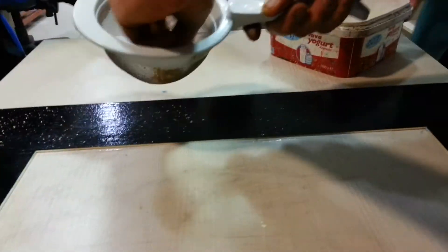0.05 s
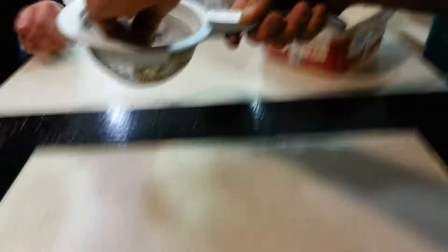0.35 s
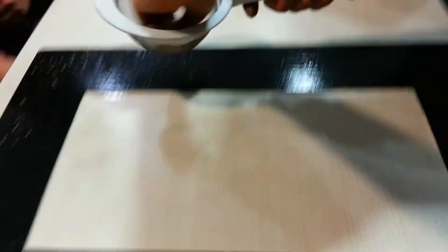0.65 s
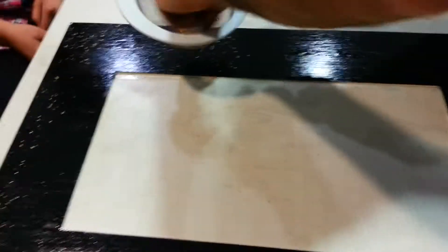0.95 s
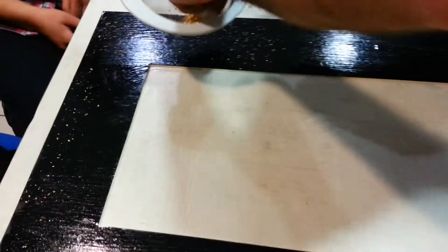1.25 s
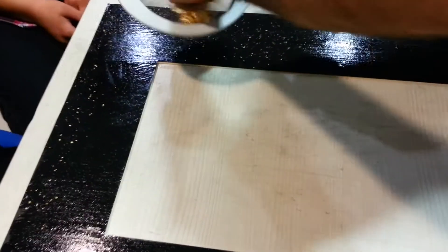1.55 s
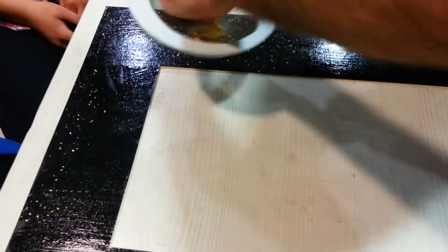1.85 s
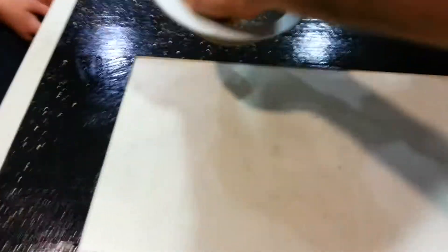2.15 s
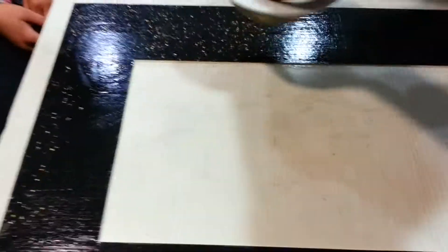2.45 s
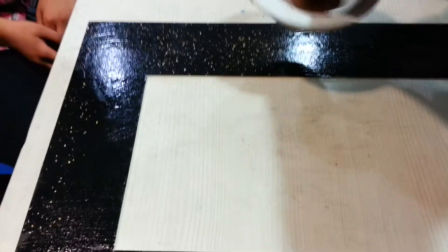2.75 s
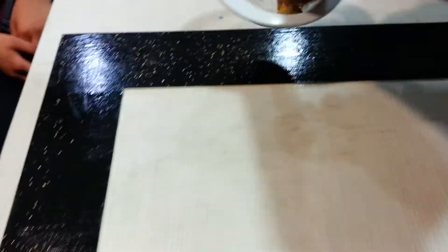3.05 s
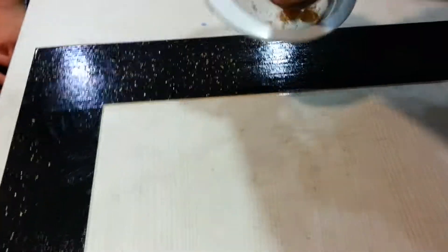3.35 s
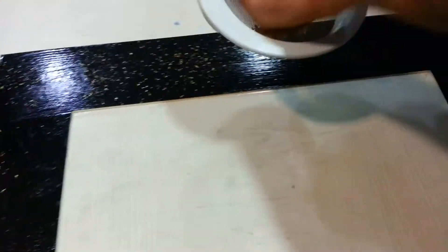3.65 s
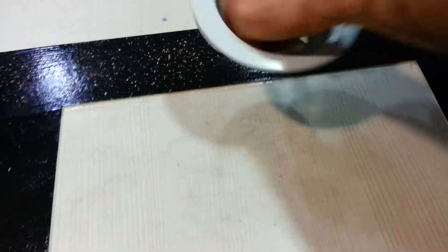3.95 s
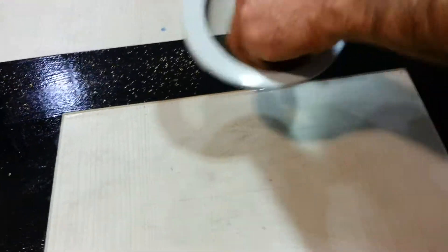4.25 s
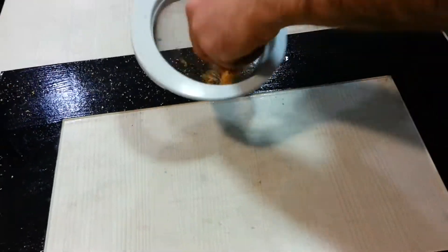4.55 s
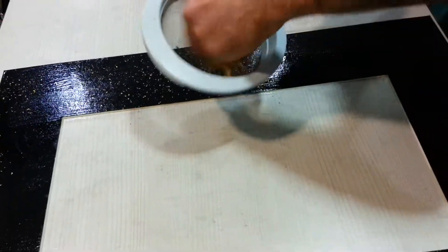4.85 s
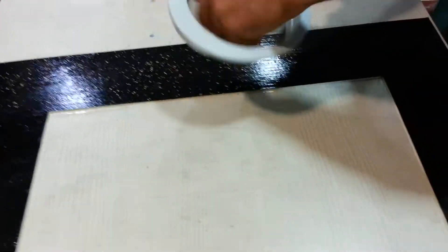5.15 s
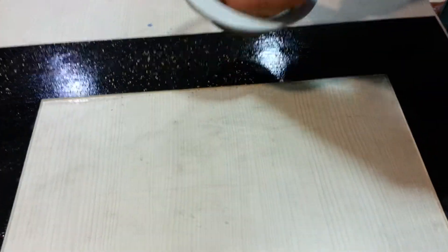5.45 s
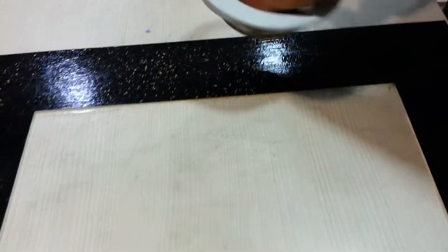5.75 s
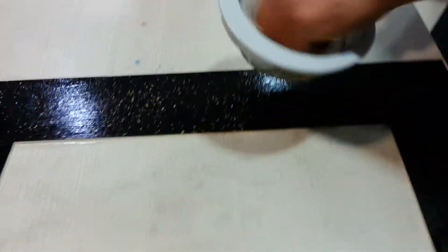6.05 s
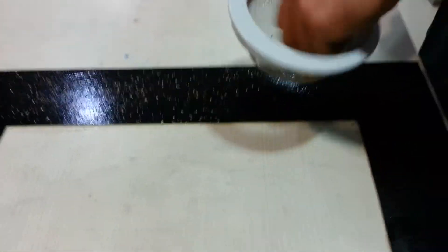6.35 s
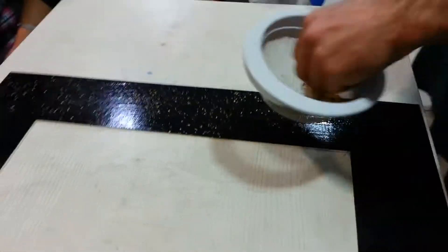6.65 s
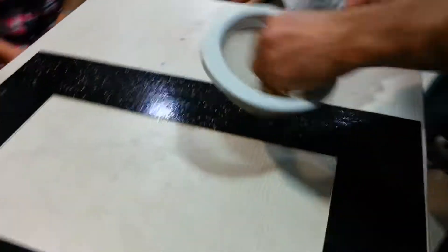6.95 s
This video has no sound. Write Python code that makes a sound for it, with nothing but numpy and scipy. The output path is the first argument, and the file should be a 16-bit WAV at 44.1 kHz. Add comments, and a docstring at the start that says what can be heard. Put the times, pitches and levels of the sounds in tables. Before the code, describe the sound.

Thin metal leaf is rubbed through a small sieve in quick, scratchy crackling strokes, with light ticks and soft handling bumps.

```python
"""A hand rubs metal leaf through a small mesh sieve over a table, close to a camera in a room.
From the start each stroke is a fine crackle of tearing flakes, over low room noise. A finger scrapes
the mesh now and then, and the held camera is bumped softly. From about 2 s, wires snap free and tick.
At 4.6 and 5.3 s two dull knocks on wood ring through the room. Skin then squeaks on a wire, a stiff
flake crinkles, and the last strokes fade among more soft bumps and a brief rustle."""
import sys
import numpy as np
from scipy import signal
from scipy.fft import rfft, irfft, next_fast_len
from scipy.io import wavfile

SR = 44100
rng = np.random.default_rng(int(sys.argv[2]) if len(sys.argv) > 2 else 0)


def to_wav(sig):
    """Store sig (one row per channel, or 1-D mono) as 16-bit WAV at the path in sys.argv[1].

    Samples outside -1..1 are clipped; the rate is SR.
    """
    pcm = np.clip(np.atleast_2d(sig), -1, 1) * 32767
    pcm = np.round(pcm).astype(np.int16)
    wavfile.write(sys.argv[1], SR, pcm.T)  # frames by channels


N = 309141
TIME = np.arange(N) / SR

# The fingers rub to and fro, about four strokes a second.
# Each row: start in seconds, length in seconds, level in dB, share of the length at peak speed.
FINGER_STROKES = [(-.06, 0.16, -48, 0.42), (0.541, 0.25, -42, 0.46), (0.816, 0.26, -45, 0.57),
                  (1.068, 0.31, -44, 0.43), (1.353, 0.33, -45, 0.23), (1.64, 0.24, -43.5, 0.15),
                  (1.862, .15, -43.5, 0.62), (2.005, .13, -43.5, 0.34), (2.178, 0.34, -47.5, 0.14),
                  (2.415, 0.22, -44.5, 0.27), (2.702, 0.17, -45, 0.058), (2.86, 0.35, -46, 0.41),
                  (3.198, 0.36, -43.5, 0.13), (3.41, 0.32, -45.5, 0.33), (3.674, 0.32, -44.5, 0.11),
                  (3.941, 0.097, -46.5, 0.52), (4.036, .15, -39.5, 0.28), (4.16, 0.36, -47.5, 0.58),
                  (4.483, 0.18, -51.5, 0.17), (4.621, 0.24, -49.5, 0.068), (4.795, 0.24, -50.5, 0.23),
                  (4.91, 0.32, -48, 0.57), (5.22, 0.28, -45, 0.27), (5.412, .25, -45.5, 0.62),
                  (5.681, 0.14, -44.5, 0.69), (5.94, 0.3, -47.5, 0.81), (6.185, 0.58, -48.5, 0.21),
                  (6.629, 0.13, -51.5, .22), (6.786, 0.11, -53.5, 0.19), (6.892, .14, -50, 0.37)]
# The hand at the sieve. Each row: time in seconds, left minus right in dB, boost of the rasp in dB.
HAND_PATH = [(0, -8, 4.5), (.35, 4, 13), (.6, -6.5, 1), (1.5, -9, -3.5), (2.5, -8, 1.5), (3.5, -8.5, -1),
             (4.5, -8.5, 5.5), (6, -7, 3.5), (7, -4.5, 9)]
# Spectra of tearing leaf and of the mesh. Each row: frequency in Hz, left and right levels in dB.
LEAF_SPECTRUM = [(60, -48, -64), (397, -16, -12), (776, -31, -19), (1410, -23, -17.5), (2220, -18.5, -22),
                 (2900, -22, -18.5), (4080, -23, -14), (5000, -15, -11.5), (6220, -12.5, -7),
                 (7340, -18.5, 2.5), (8520, -20.5, -4), (9900, -22, -9), (13200, -24, -13.5),
                 (14200, -22.5, -18)]
MESH_SPECTRUM = [(30, -33, -51), (79, -34, -42), (199, -12.5, -10.5), (563, -24, -23), (694, -18.5, -16.5),
                 (1250, -20.5, -26), (1790, -18, -23.5), (2160, -11, -16.5), (3360, -17.5, -14.5),
                 (4940, -12.5, -11), (6100, -8, -6), (7190, -14, 3.5), (8250, -16, -3.5),
                 (10540, -23, -13.5), (13100, -23, -18), (14300, -25.5, -26)]
# Low noise of the room air and the grip. Each row: time in seconds, level in dB.
RUMBLE_LEVEL = [(0, -60.5), (.37, -58), (1.09, -62.5), (2.9, -61.5), (3.4, -59), (4.25, -58), (4.55, -61.5),
                (6.8, -60.5), (7, -54.5)]
# Swells of a faint rustle. Each row: peak time in seconds, level in dB, rise and fall in seconds.
RUSTLE_SWELLS = [(.45, -58.5, .2, 0.097), (.65, -58.5, 0.17, 0.47), (6.55, -59, .1, 0.14),
                 (6.99, -44, 0.04, 0.033)]
# A finger drags over the wires. Each row: time of full force in seconds, rise and hold in seconds,
# relative level in dB, boost of the rasp in dB.
FINGER_SCRAPES = [(0.152, 0.0067, 0.013, -49, 35), (0.638, 0.0036, .004, -42.5, 10),
                  (1.522, 0.017, 0.011, -34, 0.5), (2.032, 0.0045, 0.02, -30.5, 2),
                  (2.278, 0.0022, 0.028, -29.5, 1), (2.569, 0.019, 0.0017, -43.5, 4),
                  (3.074, 0.0076, 0.011, -36, 0.5), (3.334, 0.015, 0.023, -30, -3),
                  (3.58, 0.034, 0.013, -33.5, 2), (3.732, 0.014, 0.0061, -37.5, 1),
                  (3.817, 0.0031, 0.01, -30.5, 0), (4.061, .003, 0.023, -28.5, 1),
                  (4.324, 0.0065, 0.0022, -44.5, 24), (4.832, 0.024, .002, -44, -4),
                  (5.067, 0.0099, 0.016, -35, 3), (5.769, 0.039, 0.0033, -38, 9.5),
                  (6.133, 0.023, 0.013, -40, 8), (6.526, 0.025, 0.021, -48, 25)]
# Handling of the camera. Each row: peak time in seconds, relative level in dB, rise and fall in
# seconds, low-pass cutoff in Hz.
CAMERA_BUMPS = [(0.168, -36.5, 0.032, 0.022, 1800), (.187, -36, .008, .03, 900),
                (.302, -38, 0.038, 0.017, 900), (.325, -47, 0.0092, 0.054, 350),
                (3.463, -50, 0.04, 0.034, 250), (4.128, -48, 0.098, 0.067, 180),
                (4.374, -52.5, 0.052, 0.043, 700), (4.445, -51, 0.026, 0.04, 500),
                (6.082, -55, 0.0038, .083, 500), (6.341, -50.5, 0.047, 0.045, 397),
                (6.404, -46, 0.042, .02, 350), (6.873, -51.5, 0.005, .026, 600)]
# A wire snaps free. Each row: start in seconds, level in dB, left minus right in dB.
WIRE_TICKS = [(1.901, -46.5, -9.5), (2.157, -47.5, -5.5), (2.431, -46.5, -10), (2.675, -45, -8),
              (2.917, -48.5, -3), (3.223, -51, 4), (3.346, -36.5, -15), (3.45, -43, -8.5), (3.58, -39, -17),
              (3.698, -40.5, -9), (3.823, -36, -27), (3.934, -40.5, -9.5), (4.208, -41.5, -12.5),
              (4.327, -42.5, -9), (4.441, -40, -9.5), (4.938, -48, -8), (5.466, -49, -12), (5.7, -46, -7),
              (5.889, -48, -1.5)]
# Knocks across the room. Each row: start in seconds, level in dB, high-pass and low-pass cutoffs in Hz,
# delay of the second contact in seconds, its strength relative to the first, ring level in dB,
# hollow tone in Hz, its level in dB. Ring and tone levels are relative to the thud.
WOOD_KNOCKS = [(4.637, -41, 490, 1690, 0.0047, 0.54, -0.5, 661, -4.5),
               (5.321, -44, 150, 1580, 0.011, 0.69, -4, 474, -10.5)]
# Skin sticks on a wire. Each row: start in seconds, pitch in Hz, level in dB, fall in seconds.
SKIN_SQUEAKS = [(5.59, 4100, -43, .004), (5.7, 5350, -46, .03), (5.699, 7500, -40, .03),
                (5.765, 5280, -36, .014), (5.767, 5900, -39, .012)]
# A stiff flake crinkles. Each row: start in seconds, level in dB, left minus right in dB.
FLAKE_CRINKLES = [(6.3164, -52, -5), (6.352, -36.5, 12), (6.381, -42.5, -18), (6.4066, -42, -18),
                  (6.445, -49, 3), (6.454, -56, -8), (6.4723, -51, -2)]
# Modes of the camera case and of the wood.
# Each row: frequency in Hz, relative level in dB, time to decay by 60 dB in seconds.
CASE_MODES = [(315.3, -13.5, 0.093), (359.6, -14, 0.17), (400, -7, 0.22), (784, -5, 0.061), (815, 0, 0.047)]
WOOD_MODES = [(135.2, -8.5, 0.35), (270, -8.5, 0.75), (408.5, -8.5, 0.59), (493, -22, 0.18), (626, 0, 0.35),
              (674, -19, .12), (790, -3, 0.38), (854, -6.5, 0.38), (954, -5.5, 0.19), (1215, -15, 0.42),
              (1302, -14, 0.27), (1447, -7, .36), (1865, -17, 0.39), (2385, -25, .42)]
# Spectra of room air, a bump, a thud and a crinkle. Each row: frequency in Hz, relative level in dB.
AIR_SPECTRUM = [(20, -7), (50, -12), (72, -8), (95, 2.5), (160, 4.5), (240, 6), (340, -2.5), (430, 0),
                (600, -5), (1000, -6.5), (1500, -12), (2200, -9), (3200, -29), (5500, -46)]
BUMP_SPECTRUM = [(50, -18), (120, 4.5), (220, 7.5), (350, 8.5), (440, 3.5), (580, 3), (800, 6),
                 (1100, -6.5), (1600, -3.5), (2300, -3), (3200, -12.5), (8000, -29)]
THUD_SPECTRUM = [(50, -30), (90, -10.5), (135, 3.5), (400, -5), (540, -5.5), (680, 2.5), (860, -5.5),
                 (1050, -10.5), (1450, -9), (1700, -12), (2500, -12), (3100, -21), (8000, -25.5)]
CRINKLE_SPECTRUM = [(1000, -16), (4200, -20), (5600, 9.5), (7000, 7), (8700, -11), (10500, 4), (12500, -2),
                    (14500, -11)]
# Likeness of the two microphones. Each row: frequency in Hz, correlation.
MIC_CORRELATION = [(30, 0.37), (70, 0.7), (150, 1), (300, 0.83), (600, 0.57), (1200, 0.091), (3000, 0.062),
                   (7000, 0.02)]
# Reverberation of the room. Each row: frequency in Hz, time to decay by 60 dB in seconds.
ROOM_T60 = [(120, 0.38), (320, 0.59), (840, 0.18), (2200, 0.33), (7000, 0.27), (14000, 0.13)]


def amp(db):
    """Amplitude grows tenfold with every 20 dB."""
    return 10 ** (np.asarray(db) / 20)


def unit(x):
    """Normalisation to an rms of 1."""
    return x / np.sqrt(np.mean(x ** 2) + 1e-20)


def at_hz(table, hz, column=1):
    """Interpolation of one column along a logarithmic frequency axis."""
    columns = np.transpose(table)
    return np.interp(np.log(hz + 1), np.log(columns[0] + 1), columns[column])


def curve(table, column=1):
    """Linear interpolation of one column over time."""
    columns = np.transpose(table)
    return np.interp(TIME, columns[0], columns[column])


def add(mix, start, sound):
    """Superposition: a stereo sound joins the mix at a start time in seconds."""
    part = mix[:, max(round(start * SR), 0):][:, :sound.shape[1]]
    part += sound[:, :part.shape[1]]


def band(x, hz, kind, order=2):
    """Butterworth filtering, maximally flat in the passband."""
    sections = signal.butter(order, np.clip(hz, 10, SR / 2 - 1), kind, fs=SR, output="sos")
    return signal.sosfilt(sections, x)


def colour(x, table, size=4096):
    """Minimum-phase filtering at unit energy; two level columns give each side its own spectrum."""
    hz = np.fft.rfftfreq(size, 1 / SR)
    cepstrum = irfft(np.log(amp([at_hz(table, hz), at_hz(table, hz, column=-1)])))
    # folding the cepstrum makes the filter causal
    cepstrum[:, 1:size // 2] *= 2
    cepstrum[:, size // 2 + 1:] = 0
    taps = unit(irfft(np.exp(rfft(cepstrum)))) / np.sqrt(size)
    return signal.oaconvolve(x, taps, axes=1)[:, :x.shape[1]]


def noise(count):
    """Partial coherence: white noise at two microphones, most alike in the bass."""
    size = next_fast_len(count, True)
    left, independent = rfft(rng.standard_normal((2, size)))
    correlation = np.clip(at_hz(MIC_CORRELATION, np.linspace(0, SR / 2, len(left))), -1, 1)
    right = correlation * left + np.sqrt(1 - correlation ** 2) * independent
    return irfft([left, right], size)[:, :count]


def place(x, pan_db):
    """A level difference between the sides gives direction; the overall rms is 1."""
    sides = amp(np.array([pan_db, -pan_db]).reshape(2, -1) / 2)
    return np.array([unit(x[0]), unit(x[1])]) * sides / np.sqrt(np.mean(sides ** 2, 0))


def grains(per_s, spread_db, life_s):
    """Shot noise: tiny bursts arrive at random, and the energy of each decays exponentially."""
    arrivals = rng.random(N) < per_s / SR
    sizes = amp(spread_db * np.minimum(rng.exponential(1, N), 4.5))
    energy = signal.lfilter([1], [1, -np.exp(-1 / (life_s * SR))], arrivals * sizes ** 2)
    return unit(noise(N) * np.sqrt(energy))


def envelope(t, rise, hold, fall):
    """Exponential growth to 1 at t = 0, a hold, then decay; rise and fall are seconds per 20 dB."""
    return 10 ** (np.minimum(t, 0) / max(rise, 1e-4) - np.maximum(t - hold, 0) / max(fall, 1e-4))


def rasp(x, db):
    """A broad resonance: the lower voice of the wires is raised or cut by db."""
    return x + band(x, [300, 4600], "bandpass", order=1) * (amp(db) - 1)


def rubbing(speed_exponent=1.19, trickle_db=-8.5, trickle_s=0.08, uneven_db=1.22, uneven_s=0.022):
    """Rubbing amplitude follows a power law of finger speed; loose flakes trickle on after a stroke."""
    power = np.zeros(N)
    for start, length, db, fastest in FINGER_STROKES:
        during = (TIME > start) & (TIME < start + length)
        progress = (TIME[during] - start) / length
        travel = np.interp(progress, [0, np.clip(fastest, .05, .95), 1], [0, .5, 1])
        speed = np.sin(np.pi * travel)
        power[during] += (amp(db) * speed ** speed_exponent) ** 2
    decay = np.exp(-1 / (trickle_s * SR))
    trickle = amp(trickle_db) ** 2 * signal.lfilter([1 - decay], [1, -decay], power)
    uneven = unit(band(rng.standard_normal(N), 1 / uneven_s, "lowpass"))
    return np.sqrt(power + trickle) * amp(uneven_db * uneven)


def leaf_crackle(effort):
    """Fracture: flakes tear on the mesh in thousands of tiny bursts, over the rasp of the wires."""
    tears = colour(grains(per_s=7000, spread_db=.8, life_s=.0004), LEAF_SPECTRUM)
    crackle = rasp(tears, curve(HAND_PATH, column=2))
    return place(crackle, curve(HAND_PATH)) * effort


def room(x, first_echo_s=0.0023, size=256):
    """Reverberation: a diffuse tail in which each band decays at its own rate."""
    hz, t, spectra = signal.stft(noise(SR), SR, nperseg=size)
    decay = amp(-60 * t / at_hz(ROOM_T60, hz)[:, None])
    _, tail = signal.istft(spectra * decay, SR, nperseg=size)
    tail *= np.clip(TIME[:tail.shape[1]] / first_echo_s - 1, 0, 1)
    return signal.fftconvolve(x, tail / np.linalg.norm(tail[0]), axes=1)[:, :N]


def background(effort, shudder_db=-20.5):
    """Room rumble and the sieve's shudder add in power, beside a thin hiss and a narrow-band rustle."""
    low_level = np.hypot(amp(curve(RUMBLE_LEVEL)), amp(shudder_db) * effort)
    rumble = colour(noise(N), AIR_SPECTRUM) * low_level
    hiss = colour(noise(N), MESH_SPECTRUM) * amp(-66)
    swells = sum(amp(db) * envelope(TIME - peak, rise, 0, fall) for peak, db, rise, fall in RUSTLE_SWELLS)
    rustle = unit(band(noise(N), [1950, 2550], "bandpass")) * swells
    return rumble + hiss + rustle


def finger_scrapes(lead_s=.06, reflection_s=0.001345):
    """A finger slips from wire to wire; interference with the table's reflection hollows the sound."""
    out, t = np.zeros((2, N)), TIME[:SR // 6]
    slips = colour(grains(per_s=3600, spread_db=.3, life_s=.00025), MESH_SPECTRUM)
    for peak, rise, hold, db, rasp_db in FINGER_SCRAPES:
        force = envelope(t - lead_s, rise, hold, fall=0.018)
        direct = rasp(slips[:, round(peak * SR):][:, :len(t)], rasp_db) * force
        lag = round(SR * reflection_s * (1 + 0.11 * rng.standard_normal()))
        hollow = direct + 0.24 * np.roll(direct, lag, axis=1)
        add(out, peak - lead_s, amp(db + 2.38) * unit(hollow) * np.sqrt(np.mean(force ** 2)))
    return out


def damped_mode(t, hz, db, t60, phase=0):
    """Free vibration: a sinusoid that decays by 60 dB in t60 seconds."""
    return amp(db) * np.exp(-np.log(1000) * t / t60) * np.sin(2 * np.pi * hz * t + phase)


def camera_bumps(lead_s=.06):
    """Structure-borne sound: fingers shift on the camera with dull scuffs, and its case rings briefly."""
    out, t = np.zeros((2, N)), TIME[:SR // 4]
    since_peak = np.maximum(t - lead_s, 0)
    ring = sum(damped_mode(since_peak, *mode) for mode in CASE_MODES)
    ring = band(ring, 184, "highpass")
    for peak, db, rise, fall, dull_hz in CAMERA_BUMPS:
        scuff = unit(colour(noise(len(t)), BUMP_SPECTRUM)) * envelope(t - lead_s, rise, 0.0026, fall)
        add(out, peak - lead_s, amp(db + 2.0) * band(scuff + ring, dull_hz, "lowpass", order=1))
    return out


def wire_ticks(rise_s=0.0011, patter_db=-11):
    """Sudden release: a wire snaps free, followed by a weak patter of near reflections."""
    out, t = np.zeros((2, N)), TIME[:SR // 30]
    attack = 1 - np.exp(-t / rise_s)
    patter = amp(patter_db) * np.exp(-t / 0.017)
    shape = attack * (envelope(t, rise=0, hold=.002, fall=0.0052) + patter)
    for start, db, pan_db in WIRE_TICKS:
        snap = band(colour(noise(len(t)) * shape, MESH_SPECTRUM), 460, "highpass", order=1)
        add(out, start, amp(db) * place(snap, pan_db))
    return out


def wood_knocks():
    """Impact: two quick contacts excite the modes of wood, within a thud spread by the room."""
    out, t = np.zeros((2, N)), TIME[:SR]
    for start, db, low_hz, high_hz, delay, strength, ring_db, hollow_hz, hollow_db in WOOD_KNOCKS:
        phases = rng.uniform(0, 2 * np.pi, (len(WOOD_MODES), 1, 1))
        phases = phases + 0.78 * rng.standard_normal((len(WOOD_MODES), 2, 1))  # offset at each side
        ring = sum(damped_mode(t, *mode, phase) for mode, phase in zip(WOOD_MODES, phases))
        thud_decay = np.exp(-t / 0.078) + .5 * np.exp(-t / 0.0038)
        thud = colour(noise(len(t)) * thud_decay, THUD_SPECTRUM)
        hollow = np.exp(-t / 0.017) * np.sin(2 * np.pi * hollow_hz * t)  # tone of the struck spot
        body = amp(ring_db) * unit(ring) + unit(thud) + amp(hollow_db) * unit(hollow)
        first_contact = 1 - np.exp(-t / 0.0022)
        second_contact = strength * (1 - np.exp(-np.maximum(t - delay, 0) / 0.0024))
        blow = band(body * (first_contact + second_contact), low_hz, "highpass", order=1)
        blow = band(blow, high_hz, "lowpass", order=1)
        add(out, start, amp(db) * unit(blow))
    return out


def skin_squeaks():
    """Stick-slip oscillation: skin on a wire gives brief whistles whose phase wanders."""
    out, t = np.zeros((2, N)), TIME[:SR // 12]
    for start, hz, db, fall in SKIN_SQUEAKS:
        phase = 2 * np.pi * hz * t + 0.08 * np.cumsum(noise(len(t)), axis=1)
        force = (1 - np.exp(-t / 0.00077)) * envelope(t, rise=0, hold=0.0015, fall=fall)
        add(out, start, amp(db) * force * place(np.sin(phase), pan_db=-9))
    return out


def flake_crinkles():
    """Impulsive excitation: a stiff flake gives bright cracks about a millisecond long."""
    out, t = np.zeros((2, N)), TIME[:SR // 100]
    shape = envelope(t, rise=0, hold=.0003, fall=.001)
    for start, db, pan_db in FLAKE_CRINKLES:
        crack = colour(noise(len(t)) * shape, CRINKLE_SPECTRUM)
        add(out, start, amp(db) * place(crack, pan_db))
    return out


def scene():
    """Close to the sieve, direct sound outweighs the reverberation at both microphones."""
    effort = rubbing()
    crackle, handling = leaf_crackle(effort), camera_bumps()
    sharp = finger_scrapes() + wire_ticks() + flake_crinkles() + skin_squeaks()
    sieve_echo = room(amp(-0.5) * crackle + sharp) * amp([[-11], [-16]])  # left, right
    handling_echo = amp(-10.0) * room(handling)
    return crackle + sharp + sieve_echo + handling + handling_echo + wood_knocks() + background(effort)


def record(dry, cutoff_hz=14600):
    """Band limiting: a linear-phase low-pass filter removes the highest treble."""
    taps = signal.firwin(255, cutoff_hz, window=("kaiser", 8), fs=SR)
    return signal.oaconvolve(dry, taps[None], "same")


dry = scene()
out = record(dry)
to_wav(out)
```